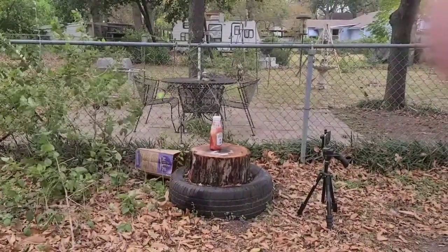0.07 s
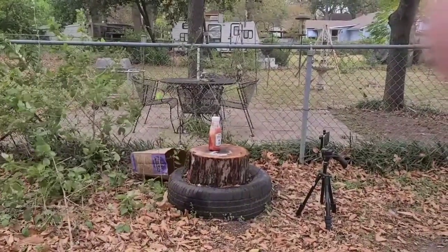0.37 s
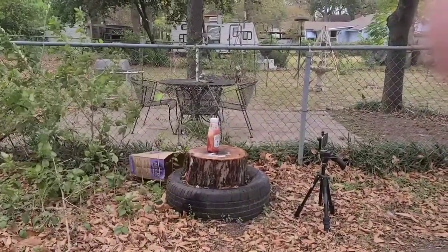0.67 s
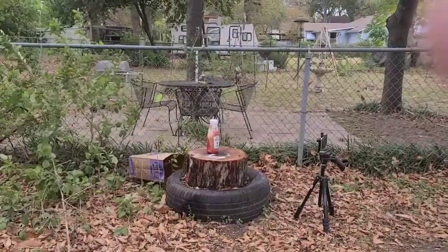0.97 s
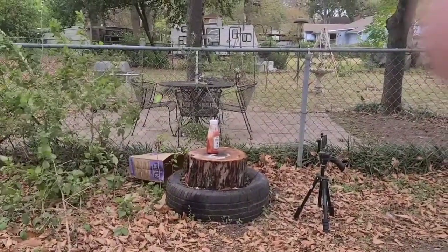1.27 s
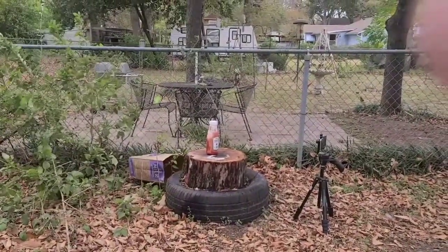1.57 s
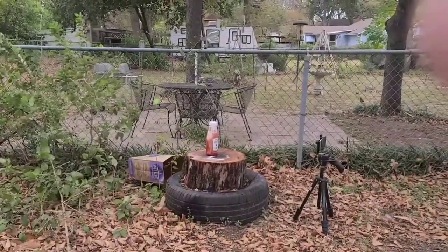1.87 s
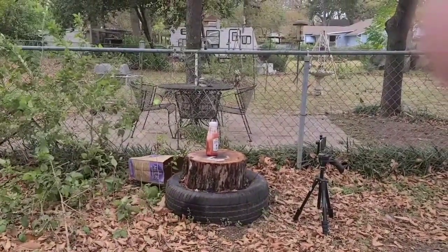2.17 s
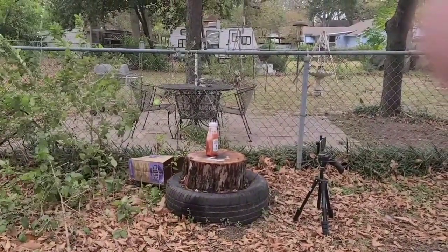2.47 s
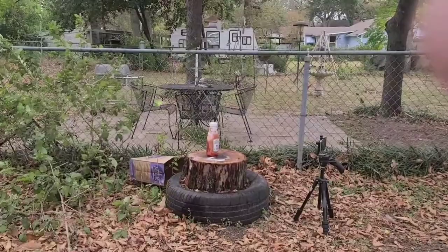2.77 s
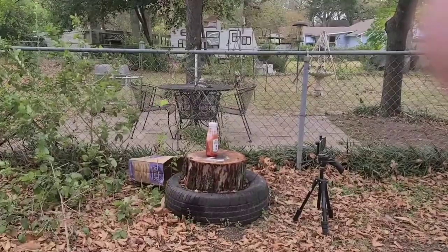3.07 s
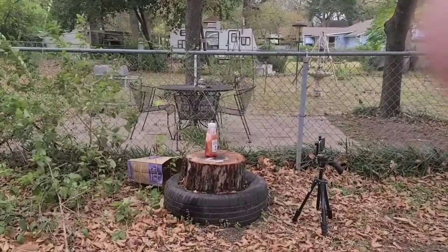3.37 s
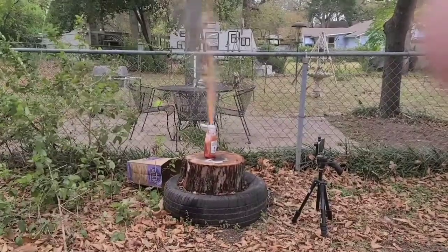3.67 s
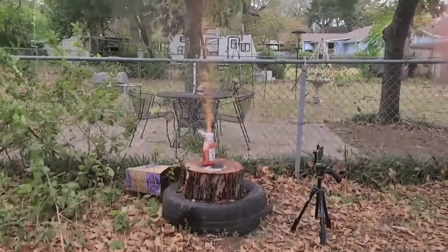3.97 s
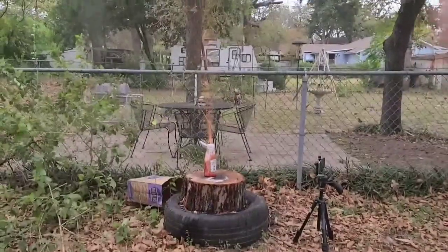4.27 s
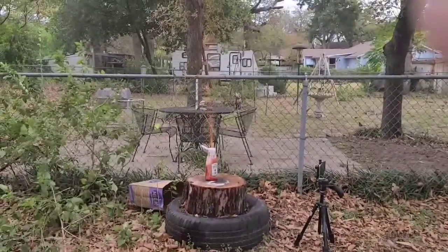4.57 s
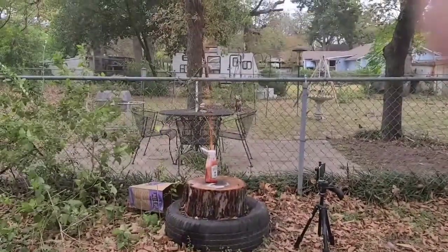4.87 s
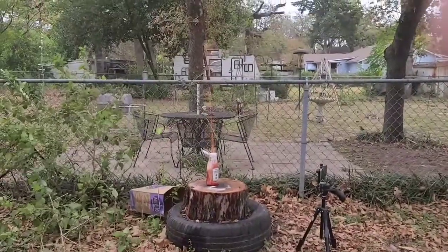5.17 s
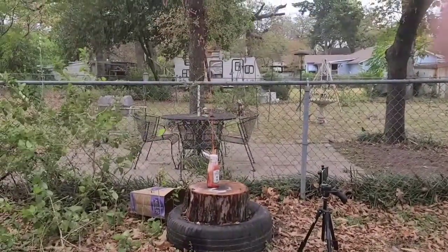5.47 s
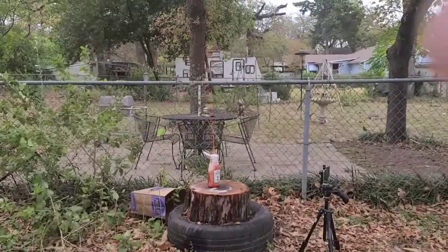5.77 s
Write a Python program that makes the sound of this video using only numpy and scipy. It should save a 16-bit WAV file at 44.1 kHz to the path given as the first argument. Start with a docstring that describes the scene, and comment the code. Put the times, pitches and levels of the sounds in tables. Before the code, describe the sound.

Low gusts thump on the microphone outdoors, with faint traffic and leaves behind. Light, close rubbing on the left gives way to a distant bird and a faint, airy whistle. Then comes a sharp crack as a bottle splits under pressure, with a tiny squeal and wet pops. Foam sprays out in a loud hiss with a hollow gurgle, sputtering and dying down amid fizzing and soft plops.

```python
"""A backyard, where a pressurised bottle bursts open: a tick, a crack and a short wet squeal, then a jet
of foam that hisses, gurgles and sputters while its pressure runs out. The ground mirrors the jet and
gives it a hollow colour; spray fizzes and foam patters back down. Distant traffic and leaves murmur, and
wind buffets the microphone's two openings (its ports). Before the burst, something rubs by the left
port, a far bird calls and a thin whistle grows."""
import sys
import numpy as np
from scipy import signal
from scipy.fft import rfft, irfft
from scipy.io import wavfile
from scipy.ndimage import uniform_filter1d

SR = 44100
rng = np.random.default_rng(int(sys.argv[2]) if len(sys.argv) > 2 else 0)


def wav_out(sig):
    """Save sig, one row per channel (or a flat mono array), as 16-bit PCM at SR to the path in sys.argv[1]."""
    wavfile.write(sys.argv[1], SR, np.round(np.clip(np.atleast_2d(sig).T, -1, 1) * 32767).astype(np.int16))


N = 256220
T = np.arange(N) / SR
HZ = np.fft.rfftfreq(N, 1 / SR)
TICK_S, BURST_S = 3.6997, 3.7062  # the bottle ticks, then splits open
SINCE_BURST = np.maximum(T - BURST_S, 0)


def amp(db):
    """Turns decibels into a gain."""
    return 10 ** (np.asarray(db) / 20)


def unit(x):
    """Scales a signal to an average (rms) level of 1."""
    return x / np.sqrt(np.mean(x ** 2) + 1e-20)


def pan(db):
    """Left and right gains that make the left side louder by db."""
    return amp([[db / 2], [-db / 2]])


def bump(s, half):
    """A smooth swell of height 1 around second s."""
    return np.exp(-((T - s) / half) ** 2)


def read(points, hz):
    """Looks up frequencies in a table, on a logarithmic scale."""
    f, value = np.transpose(points)
    return np.interp(np.log(hz + 1), np.log(f + 1), value)


def follow(rows, column):
    """Glides through one column of a table as time passes."""
    rows = np.array(rows)
    return np.interp(T, rows[:, 0], rows[:, column])


def during(rows, fade_s):
    """Fades in at a table's first time and out at its last."""
    return np.clip(np.minimum(T - rows[0][0], rows[-1][0] - T) / fade_s, 0, 1)


def colour(x, points):
    """Filters a sound by a table of levels, ringing only after each click, never before."""
    log_gain = np.log(amp(read(points, abs(np.fft.fftfreq(4096, 1 / SR)))))
    taps = np.fft.ifft(np.exp(np.conj(signal.hilbert(log_gain)))).real[:2048]
    return signal.oaconvolve(x, taps)[:N]


def wander(rate_hz):
    """A smooth random wobble of average size 1."""
    return unit(irfft(rfft(rng.standard_normal(N)) * np.exp(-(HZ / rate_hz) ** 2), N))


def pair(a, b, same):
    """Mixes two unrelated signals into left and right; same=1 makes them identical."""
    return np.array([a, irfft(same * rfft(a) + np.sqrt(1 - same ** 2) * rfft(b), N)])


def noise(points, same):
    """Stereo noise of level 1, coloured by a table."""
    white = pair(*rng.standard_normal((2, N)), same)
    return unit(irfft(rfft(white) * amp(read(points, HZ)), N))


def grains(per_s, spread_db):
    """Scattered clicks of uneven size."""
    size = amp(spread_db * np.minimum(rng.exponential(1, N), 4)) * rng.choice([-1, 1], N)
    return unit(size * (rng.random(N) < per_s / SR))


# The background wash. Each row: frequency in Hz, level in dB.
YARD_COLOUR = [(40, 5), (200, 0), (500, 0), (760, 2.5), (1050, -4.5), (1900, -4.5), (2400, -12.5),
               (4000, -15.5), (5600, -19), (9000, -21.5), (11000, -28.5), (12500, -49), (14500, -51)]
# Each row: frequency in Hz, how alike left and right are (0 to 1).
YARD_LIKENESS = [(50, 0.99), (600, 0.75), (2000, 0.049), (5000, 0.15)]

def yard(level_db=-42, swell_db=-0.5):
    """Distant traffic and leaves blend into a steady wash."""
    return noise(YARD_COLOUR, read(YARD_LIKENESS, HZ)) * amp(level_db + swell_db * wander(rate_hz=8.7))


# One list for each note. Each row: time in seconds, base pitch in Hz, level in dB.
BIRD_NOTES = [
    [(2.045, 1435, -61), (2.082, 1410, -56), (2.11, 1338, -54), (2.135, 1285, -60)],
    [(2.13, 1275, -59), (2.17, 1262, -56), (2.195, 1205, -54), (2.26, 1207, -54), (2.305, 1100, -57)],
]

def bird(overtones_db=(-2.5, -8.5, -9), fading_db=3.5):
    """Falling notes heard by their overtones, each fading in and out on its way through the trees."""
    out = np.zeros(N)
    for note in BIRD_NOTES:
        pitch = follow(note, column=1) * (1 + 0.003 * wander(rate_hz=170))
        angle = 2 * np.pi * np.cumsum(pitch) / SR
        voice = sum(amp(db + fading_db * wander(rate_hz=14)) * np.sin(multiple * angle)
                    for multiple, db in enumerate(overtones_db, start=2))
        out += voice * amp(follow(note, column=2)) * during(note, fade_s=.01)
    return out


# Each row: middle of a swell in seconds, half its length in seconds, level in dB.
WHISTLE_SWELLS = [(3.043, 0.041, -52), (3.192, 0.021, -50), (3.4, 0.02, -51), (3.60, 0.043, -50)]

def whistle(pitch_hz=1979, sag_hz=16, waver=0.00202, fuzz=0.44, base_db=-54.5,
            start_s=2.45, rise_s=0.53, stop_s=3.7):
    """A thin, airy tone that grows, goes a little flat in each swell and stops at the burst."""
    swells = np.array([bump(s, half) for s, half, _ in WHISTLE_SWELLS])
    pitch = pitch_hz * (1 + waver * wander(rate_hz=8.1)) - sag_hz * swells.sum(0)
    angle = 2 * np.pi * np.cumsum(pitch) / SR
    tone = (1 + fuzz * wander(rate_hz=38)) * np.sin(angle) + fuzz * wander(rate_hz=22) * np.cos(angle)
    level = amp(base_db) + amp(np.array(WHISTLE_SWELLS)[:, 2]) @ swells
    sounding = np.clip(np.minimum((T - start_s) / rise_s, (stop_s - T) / 0.0097), 0, 1)
    return tone * level * sounding * pan(db=7)


# The wind's deep rumble and its higher flutter. Each row: frequency in Hz, level in dB.
RUMBLE_COLOUR = [(10, -16), (25, -7.5), (55, 3.5), (80, 2), (110, -3), (160, -15.5), (300, -65)]
FLUTTER_COLOUR = [(70, -8.5), (130, -1), (200, -5), (300, -10), (500, -18.5), (1200, -74)]
# Each row: middle of a gust in seconds, half its length in seconds, rumble in dB, flutter in dB,
# left minus right in dB.
GUSTS = [(0.66, 0.057, -30.5, -37.5, 1.5), (.78, 0.047, -35, -46.5, 5), (0.988, .03, -34, -62, 5),
         (1.23, 0.042, -36.5, -37.5, -3), (1.473, 0.084, -34.5, -43, 7.5), (1.715, 0.031, -38, -44.5, -8),
         (1.818, 0.035, -32.5, -40, 10.5), (1.93, 0.021, -31.5, -44, 13.5), (2.076, 0.076, -33, -39, 4.5),
         (2.283, 0.11, -39, -45.5, -2), (2.8, 0.078, -37, -46.5, 11), (2.99, 0.058, -41, -43.5, 10),
         (3.13, 0.065, -36.5, -42, 9), (3.273, 0.018, -34.5, -58, 1), (3.425, 0.027, -30, -39, 10),
         (3.523, 0.049, -33, -37, 6), (3.736, 0.057, -38.5, -43.5, 5), (3.89, 0.043, -35, -37.5, -1.5),
         (4.043, 0.091, -40.5, -47.5, 13.5), (4.181, 0.028, -30.5, -39.5, 3.5), (4.284, 0.028, -35, -34, 9),
         (4.427, .06, -41, -49, 8), (4.72, 0.026, -43, -61, -3), (4.85, 0.058, -34.5, -42, -8),
         (4.938, 0.015, -33, -30.5, -9), (5.098, 0.058, -35.5, -46, 5), (5.452, .038, -32, -33.5, 6),
         (5.576, 0.034, -39, -37.5, 12), (5.675, 0.06, -33.5, -51, 11), (5.8, 0.031, -49, -42.5, 8)]
# Small whirls of air. Each row: time in seconds, level in dB, pitch in Hz, half length in seconds,
# left minus right in dB.
EDDIES = [(1.161, -26.5, 67, 0.016, -7), (2.204, -23, 66, 0.014, -13.5), (3.093, -28.5, 78.5, 0.023, 10),
          (4.874, -29.5, 85.4, 0.032, -9), (5.702, -19.5, 65, 0.0064, -18)]

def wind(breeze_rumble_db=-41, breeze_flutter_db=-49.5, lumpy_db=1.5):
    """A breeze and its gusts press on the ports, each gust from its own side; single eddies thump."""
    rumble_power, flutter_power = amp(breeze_rumble_db) ** 2, amp(breeze_flutter_db) ** 2
    for s, half, rumble_db, flutter_db, side_db in GUSTS:
        gust = bump(s, half) * pan(side_db) ** 2
        rumble_power = rumble_power + gust * amp(rumble_db) ** 2
        flutter_power = flutter_power + gust * amp(flutter_db) ** 2
    rumble = noise(RUMBLE_COLOUR, same=.2) * np.sqrt(rumble_power) * amp(lumpy_db * wander(rate_hz=12))
    flutter = noise(FLUTTER_COLOUR, same=0.29) * np.sqrt(flutter_power) * amp(2 * wander(rate_hz=65) - 1)
    out = rumble + flutter * pan(db=4)
    for (s, db, hz, half, side_db), (turn, right_turn) in zip(EDDIES, rng.random((len(EDDIES), 2))):
        phase = 2 * np.pi * (turn + np.array([[0], [right_turn / 4]]))
        out += amp(db) * pan(side_db) * bump(s, half) * np.cos(2 * np.pi * hz * (T - s) + phase)
    return out


def stroke(start, length, db, bite_s=0.021, press_db_per_s=25.5, let_go_s=0.058):
    """The force of one rub: it bites, presses harder as it goes, and lets go."""
    past_end = T - start - length
    pressing = amp(db + press_db_per_s * np.minimum(past_end, 0))
    return np.clip((T - start) / bite_s, 0, 1) * pressing * np.exp(-np.maximum(past_end, 0) / let_go_s)


def shifting_contact(x, crisp_db, body_db, patch_db=2.5, sheen_hz=10800, body_hz=2950, width_hz=750):
    """The rub's colour shifts in random patches; a crisp stroke adds top treble, a firm one body."""
    hz, t, spectrum = signal.stft(x, SR, nperseg=512)
    patches = uniform_filter1d(rng.standard_normal(spectrum.shape), 5, axis=1)  # smooth over time
    patches = unit(uniform_filter1d(patches, 7, axis=0))  # and over frequency
    sheen_db = np.interp(t, T, crisp_db) / (1 + np.exp((sheen_hz - hz[:, None]) / 500))
    firm_db = np.interp(t, T, body_db) * np.exp(-((hz[:, None] - body_hz) / width_hz) ** 2)
    return signal.istft(spectrum * amp(patch_db * patches + sheen_db + firm_db), SR, nperseg=512)[1][:N]


# The rubbing at the near and at the far port. Each row: frequency in Hz, level in dB.
RUB_NEAR_COLOUR = [(1500, -28), (2300, -17), (2650, -1), (4000, 0), (5700, 2.5), (7500, 8.5), (9000, -1),
                   (10000, -14), (11500, 4.5), (13500, -20), (14500, -30)]
RUB_FAR_COLOUR = [(1500, -23), (2700, 2), (5000, 6), (6500, -6), (8000, -8), (9000, 4), (11500, 9),
                  (13500, -5), (14500, -28)]
# Each row: start in seconds, length in seconds, final level in dB, extra treble in dB, extra body in dB.
RUB_STROKES = [(0, 0.35, -43.3, -11, -0.5), (0.285, 0.12, -37.3, -2, -1.5), (0.439, 0.039, -35, -4, 3),
               (0.592, 0.35, -47, -9, -2), (0.936, 0.095, -33, -2, -3.5), (1.064, 0.166, -36.5, 4, 6.5),
               (1.224, 0.087, -34, 10, -0.5)]
# Small snags while the rubbing lasts, then three faint lone ticks after it has stopped.
# Each row: time in seconds, relative level in dB.
TICKS = [(0.218, -36), (0.224, -37), (0.2944, -34), (0.334, -32), (.342, -30), (.3555, -32), (.4395, -29),
         (.4435, -32), (.485, -25.5), (0.579, -36), (.63, -39), (.659, -39), (0.9, -34), (1.006, -27),
         (1.025, -30), (1.2155, -36), (1.244, -17.5), (1.266, -29), (1.269, -29), (1.2847, -35),
         (1.307, -33), (1.328, -32), (1.3435, -33), (1.367, -36.5), (1.962, -37.5), (2.148, -38),
         (2.617, -42)]

def rubbing(force_db=1.0, grain_db=2, tick_db=-3, tick_s=0.0019, click_db=12, right_db=-15):
    """Dry friction by the left port: tiny slips hiss, snags click and scrape; lone ticks follow."""
    strokes = np.array([stroke(*row[:3]) for row in RUB_STROKES])
    # the strongest stroke has the most say in the colour
    crisp_db, body_db = np.array(RUB_STROKES)[:, 3:].T @ strokes / (strokes.sum(0) + 1e-3)
    force = strokes.max(0) * amp(force_db + 0.81 * wander(rate_hz=110))
    force += sum(amp(tick_db + db) * (T > s) * np.exp(-abs(T - s) / tick_s) for s, db in TICKS)
    clicks = sum(amp(click_db + db) * (np.arange(N) == round(s * SR)) for s, db in TICKS)
    sides = []
    for port in (RUB_NEAR_COLOUR, RUB_FAR_COLOUR):
        slips = unit(rng.standard_normal(N) + amp(grain_db) * grains(per_s=1100, spread_db=2.5))
        scrape = colour(slips * force + clicks, port) / np.std(colour(slips, port))
        sides.append(shifting_contact(scrape, crisp_db, body_db))
    return np.array(sides) * amp([[0], [right_db]])


# Soft plops of foam. Each row: frequency in Hz, level in dB.
PLOP_COLOUR = [(120, -17), (300, -7), (550, -4.5), (760, 5), (1100, -8), (2500, -32)]

def falling_foam(level_db=-47, flight_s=1.13, rise_s=0.44):
    """After their flight through the air, blobs of foam patter down on the leaves."""
    plops = [unit(colour(grains(per_s=500, spread_db=2.0), PLOP_COLOUR)) for _ in range(2)]
    return pair(*plops, same=0.31) * amp(level_db) * np.clip((SINCE_BURST - flight_s) / rise_s, 0, 1)


# Fine bubbles. Each row: frequency in Hz, level in dB.
FIZZ_COLOUR = [(5000, -30), (8500, -10), (10500, -4), (11500, -6), (12700, 1), (13500, -9), (14000, -25)]

def fizz(level_db=-39, rise_s=.6, fade_db_per_s=9):
    """Tiny bubbles burst in the cloud of spray, which builds up and fades more slowly than the jet."""
    bubbles = np.array([unit(colour(grains(per_s=4200, spread_db=1), FIZZ_COLOUR)) for _ in range(2)])
    build_up = np.minimum(SINCE_BURST / rise_s, 1) ** 2
    return bubbles * build_up * amp(level_db - fade_db_per_s * SINCE_BURST)


# Each row: middle of a pop in seconds, half its length in seconds, pitch in Hz, level in dB.
GOBS = [(3.713, .004, 600, -28), (3.732, 0.0053, 680, -28), (3.751, .004, 1850, -22),
        (3.765, 0.0045, 680, -30), (3.799, .016, 700, -33)]

def gobs(rough=0.79, sag_per_s=9):
    """The first thick gobs leave the split with short, wet, falling pops."""
    out = np.zeros(N)
    for s, half, hz, db in GOBS:
        pitch = hz * np.exp(-sag_per_s * np.clip(T - s, -2 * half, 2 * half))
        angle = 2 * np.pi * np.cumsum(pitch) / SR
        out += amp(db) * bump(s, half) * np.sin(angle + rough * wander(rate_hz=300))
    return out


def drained_db(db_per_s=10.5, db_per_s2=1.18):
    """How far the pressure has fallen as the bottle empties, a little faster towards the end."""
    return db_per_s * SINCE_BURST + db_per_s2 * SINCE_BURST ** 2


def sputter(rate_hz=44, uneven=0.3, depth_db=1.1, growth_db_per_s=.8):
    """A level swing in dB: gas and foam take turns in the split, more strongly as the bottle empties."""
    turns = np.cumsum(rate_hz * np.exp(uneven * wander(rate_hz=50))) / SR
    throb = np.cos(2 * np.pi * turns) + .35 * np.sin(4 * np.pi * turns) + 0.6 * wander(rate_hz=130)
    return unit(throb) * (depth_db + growth_db_per_s * SINCE_BURST)


def ring(x, hz, width_hz):
    """Makes a sound ring in a narrow band around a moving pitch."""
    turn = np.exp(2j * np.pi * np.cumsum(hz) / SR)
    decay = np.exp(-np.pi * width_hz / SR)
    return 2 * (turn * signal.lfilter([(1 - decay) ** 2], [1, -2 * decay, decay ** 2], x / turn)).real


# The bottle's hollow tones. Each row: pitch in Hz, width in Hz, level in dB.
HOLLOW_TONES = [(797, 130, -6), (1292, 105, 6.5), (1472, 273, 5.5), (2280, 160, 4), (2890, 190, 1)]
# Lumps of foam pass the split. Each row: time in seconds, half length in seconds,
# change of the gurgle in dB, change of the jet's hiss in dB.
FOAM_LUMPS = [(3.802, .018, 3.5, 3), (3.85, .03, -4, 2), (3.957, 0.023, 6, 1.5), (4.133, 0.013, 6.5, -1),
              (4.204, 0.0049, 1, -2), (4.63, 0.031, 3.5, 1.5), (4.707, 0.022, 4.5, 1.5),
              (4.79, .02, 1, 2.5), (4.974, .005, 3, 2), (5.085, .008, 4, 2.5), (5.34, 0.005, 4, 2),
              (5.43, .006, 10, 3), (5.5, .006, 4, 1), (5.6, 0.01, 5, 1)]

def gurgle(throb_db, level_db=-31.4, drain_share=.82, bubble_db=-4,
           full_rise=0.293, clearing_s=0.07, slosh_hz=48):
    """Bursting bubbles ring the hollow above the foam; its pitch sinks, and wanders as foam sloshes."""
    bubbles = rng.standard_normal(N) + amp(bubble_db) * grains(per_s=450, spread_db=5.5)
    stretch = 1 + full_rise * np.exp(-SINCE_BURST / clearing_s)  # higher while the bottle is full
    hollow = unit(sum(amp(db) * ring(bubbles, hz * stretch + slosh_hz * wander(rate_hz=23), width)
                      for hz, width, db in HOLLOW_TONES))
    surge_db = sum(db * bump(s, half) for s, half, db, _ in FOAM_LUMPS)
    level = amp(level_db - drain_share * drained_db() + surge_db + throb_db)
    return hollow * (T > BURST_S) * level * pan(db=2.5)


# The jet's hiss. Each row: frequency in Hz, level in dB.
JET_COLOUR = [(200, -11.5), (500, -32), (800, -6), (1080, -17), (1300, -0.5), (1650, -3.5), (2000, -5.5),
              (2550, -7), (3200, -8.5), (3600, -2.5), (5700, -4.5), (9000, -1), (12000, 2.5),
              (14500, -11.5)]
# Each row: frequency in Hz, how alike left and right are (0 to 1).
JET_LIKENESS = [(300, 0.95), (1400, 0.96), (4500, 0.48), (6000, 0.35), (9300, 0.94), (14000, 0.28)]

def jet(throb_db, start_db=-20.5, dulling=0.12, untilted_db=-30, spit_db=-7,
        flicker_db=0.93, throb_share=0.67):
    """Churning gas and bursting foam hiss, surging with the lumps and dulling as the pressure falls."""
    gas = rng.standard_normal((2, N))
    spits = np.array([grains(per_s=900, spread_db=4.0) for _ in range(2)])
    flow = pair(*(gas + amp(spit_db) * spits), read(JET_LIKENESS, HZ))
    flow = unit(np.array([colour(side, JET_COLOUR) for side in flow]))
    pressure_db = start_db - drained_db()
    hz, t, spectrum = signal.stft(flow, SR, nperseg=512)
    tilt_db_per_octave = dulling * (np.interp(t, T, pressure_db) - untilted_db)
    octaves = np.log2(np.maximum(hz, 700) / 2500)[:, None]
    hiss = signal.istft(spectrum * amp(tilt_db_per_octave * octaves), SR, nperseg=512)[1][:, :N]
    opening = np.minimum(SINCE_BURST / 0.0072, 1)
    surge_db = sum(db * bump(s, half) for s, half, _, db in FOAM_LUMPS)
    shake_db = throb_share * throb_db + flicker_db * wander(rate_hz=280)
    return hiss * opening * amp(pressure_db + surge_db + shake_db)


# The bottle gives way. Each row: start in seconds, relative level in dB, fading time in seconds.
CRACKS = [(3.6997, -18, .0075), (3.7062, -6, 0.0049), (3.71, -10, 0.0014), (3.714, -12, .0041),
          (3.729, -12.5, 0.0069)]
# The noise of those cracks. Each row: frequency in Hz, level in dB.
CRACK_COLOUR = [(100, -15), (450, -12), (780, 0), (1050, -9), (1300, 3), (1900, 3), (2600, -1), (4400, -12),
                (5800, -3), (9000, -4), (14000, -12.5)]
# The wall's ring. Each row: pitch in Hz, level in dB, seconds to fade by 60 dB.
WALL_TONES = [(775, -22.5, 0.1), (1295, -11, 0.037), (1890, 0, 0.0055), (2890, -14, 0.032)]
# The squeal's path. Each row: time in seconds, pitch in Hz, relative level in dB.
SQUEAL_PATH = [(3.713, 2700, -20), (3.7175, 2400, 0), (3.7195, 2170, 0), (3.723, 2150, -13),
               (3.728, 2250, -7), (3.7315, 2300, -9), (3.7342, 1600, -9), (3.737, 1200, -28)]

def burst(crack_db=-3, squeal_db=-8, overtone_db=-11, snap_rise_s=0.001):
    """The wall snaps and rings, gas puffs out, and the split's lips squeal as they are forced apart."""
    puffs = sum(amp(db) * np.clip((T - s) / 0.0006, 0, 1) * np.exp(-np.maximum(T - s, 0) / decay)
                for s, db, decay in CRACKS)
    snap = sum(amp(db - 60 * np.minimum(SINCE_BURST / ring_s, 2)) * np.sin(2 * np.pi * hz * SINCE_BURST)
               for hz, db, ring_s in WALL_TONES)
    snap *= np.minimum(SINCE_BURST / snap_rise_s, 1)
    pitch = follow(SQUEAL_PATH, column=1) * (1 + 0.0271 * wander(rate_hz=474))
    angle = 2 * np.pi * np.cumsum(pitch) / SR
    squeal = np.sin(angle) + amp(overtone_db) * np.sin(2 * angle)
    squeal *= amp(squeal_db + follow(SQUEAL_PATH, column=2)) * during(SQUEAL_PATH, fade_s=0.001)
    return amp(crack_db) * puffs * noise(CRACK_COLOUR, same=1.0) + snap + squeal


# Echoes from a stump, a carton and a fence. Each row: delay in seconds, level in dB.
ECHOES = [(.0052, -15.5), (0.0122, -14.5), (0.0205, -28)]
# Each row: frequency in Hz, how far the left wave runs ahead of the right in radians.
LEFT_LEAD = [(100, 0.5), (800, 0.58), (1700, 0.56), (2100, 0.14), (3500, -0.98), (5000, -0.5), (7000, -2),
             (8500, 0.5), (9500, -2.5), (12000, -5.5)]

def outdoors(x, ground_hz=728, ground_gain=0.14, soak_hz=4800, scatter_db=-14, tail_s=0.58):
    """The ground's echo makes the sound hollow; things nearby reflect it; trees scatter a thin tail."""
    ground = ground_gain * np.exp(-(HZ / soak_hz) ** 2 - 2j * np.pi * HZ / ground_hz)
    echoes = sum(amp(db) * np.exp(-2j * np.pi * HZ * delay) for delay, db in ECHOES)
    lead = np.exp(1j * np.outer([.5, -.5], read(LEFT_LEAD, HZ)))
    near = irfft(rfft(x) * (1 + ground + echoes) * lead, N) * (T > TICK_S)
    t = T[:SR // 2]
    trees = rng.standard_normal((2, len(t))) * (rng.random((2, len(t))) < 1500 / SR)
    trees *= (t > .006) * amp(-60 * t / tail_s)
    trees /= np.linalg.norm(trees, axis=1, keepdims=True)
    return near + amp(scatter_db) * signal.fftconvolve(near, trees, axes=1)[:, :N]


def scene():
    """The bottle in its yard; jet and gurgle share one sputter."""
    throb_db = sputter()
    bottle = jet(throb_db) + gurgle(throb_db) + burst() + gobs()
    return outdoors(bottle) + fizz() + falling_foam() + rubbing() + wind() + yard() + whistle() + bird()


# The microphone's two ports. Each row: frequency in Hz, boost or cut in dB.
LEFT_PORT = [(500, 1), (1500, 3), (1950, -1), (2700, 7.5), (5700, 7), (6100, -5), (6700, -25.5),
             (7500, -23), (8300, -13), (9000, -7), (10400, -13.5), (11600, -20), (12700, -16),
             (14400, -12.5)]
RIGHT_PORT = [(500, 2.5), (1400, -1.5), (2200, 5), (3300, -1), (4500, -4.5), (5200, -10), (6500, -8.5),
              (7400, -19), (7900, -28), (8500, -19.5), (10300, -11), (11900, -25), (12700, -15.5),
              (13600, -24), (14200, -62)]

def record(dry):
    """Each port colours the sound, loud peaks are rounded off and the highest treble is cut."""
    heard = np.tanh([colour(dry[0], LEFT_PORT), colour(dry[1], RIGHT_PORT)])
    treble_cut = signal.firwin(511, cutoff=14550, window=("kaiser", 9), fs=SR)
    return signal.oaconvolve(heard, treble_cut[None], "same")


dry = scene()
out = record(dry)
wav_out(out)
```